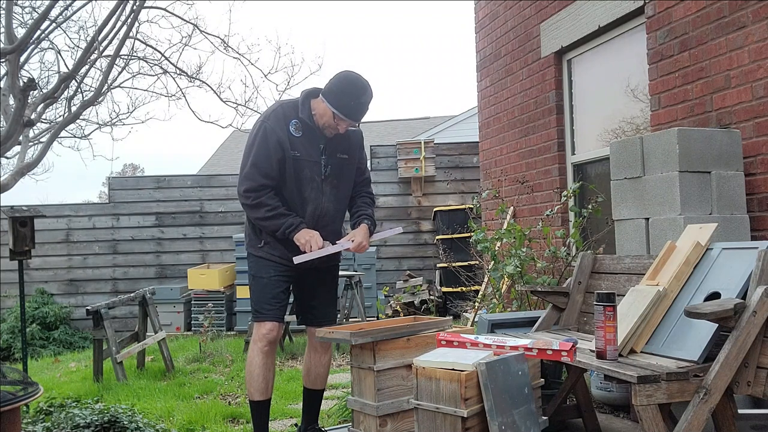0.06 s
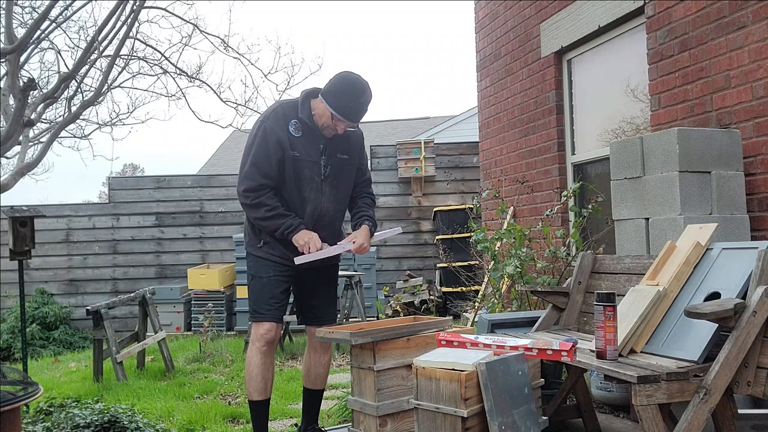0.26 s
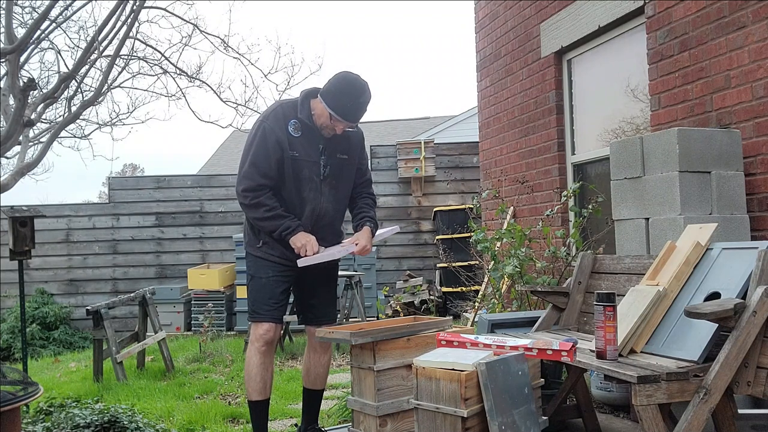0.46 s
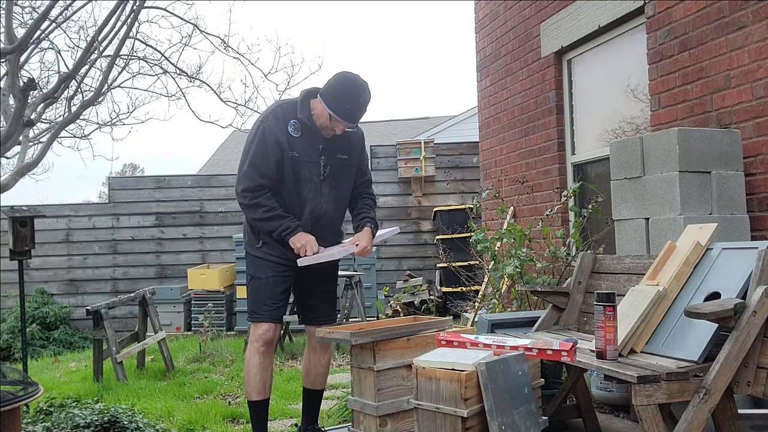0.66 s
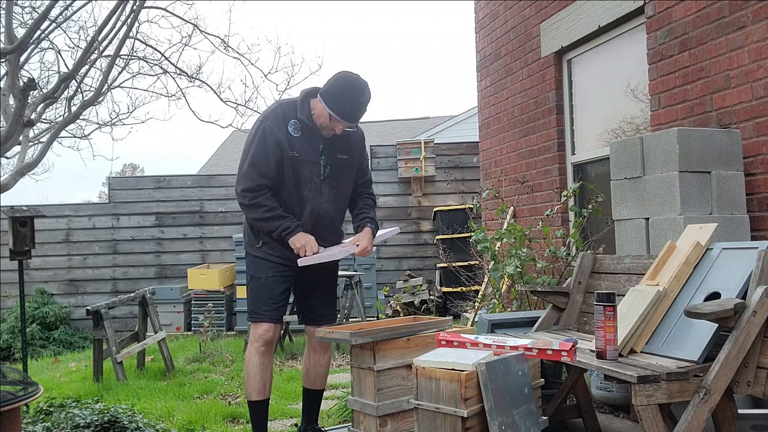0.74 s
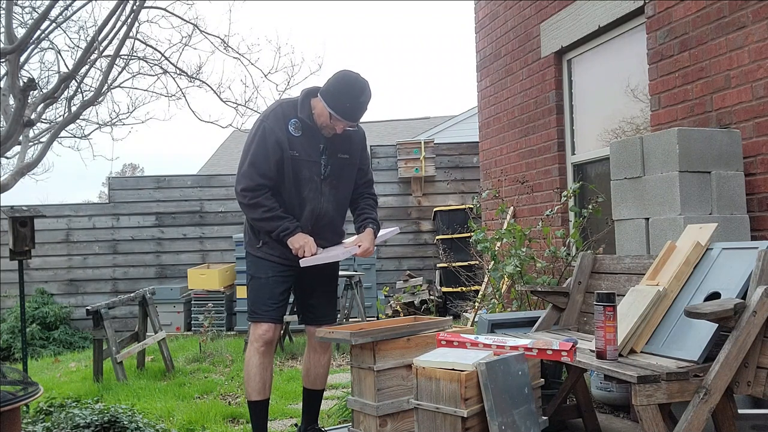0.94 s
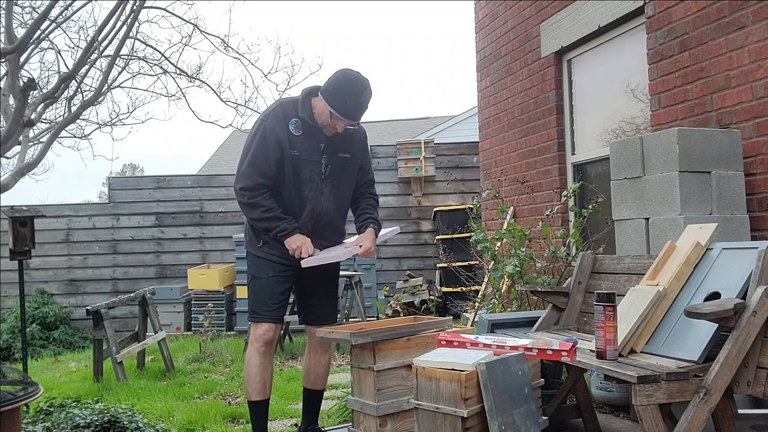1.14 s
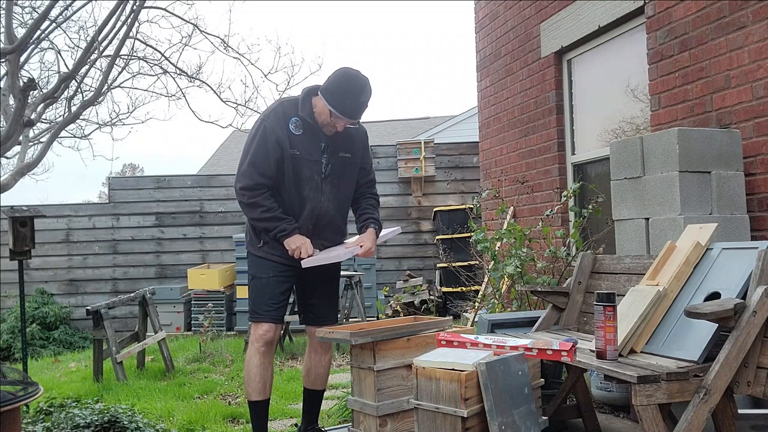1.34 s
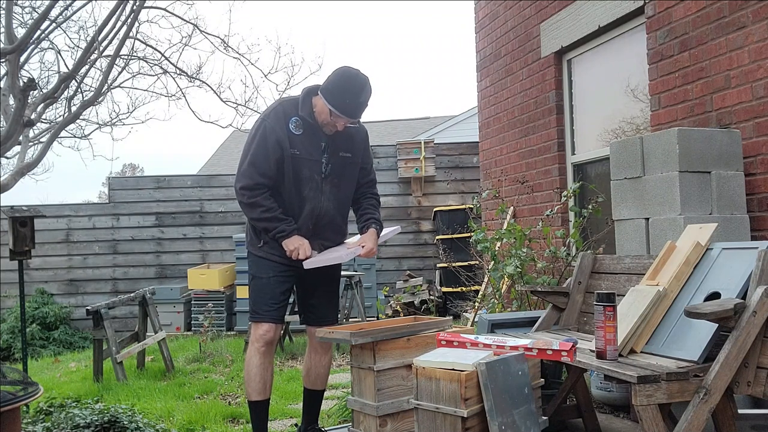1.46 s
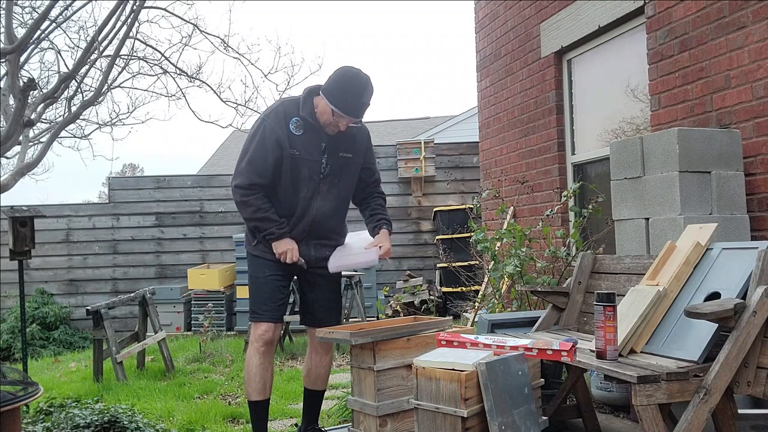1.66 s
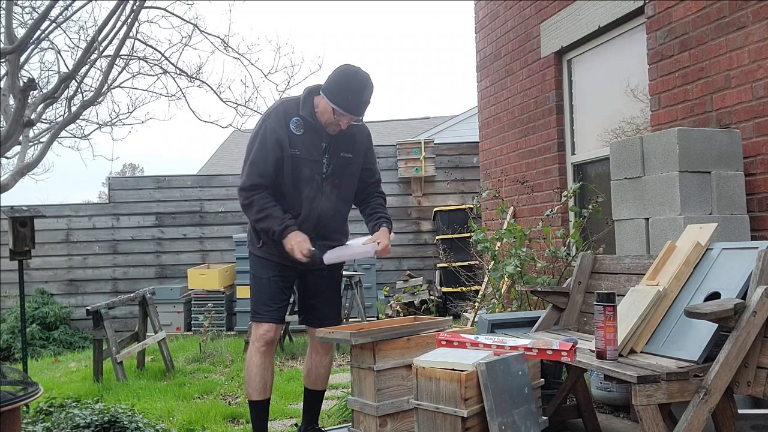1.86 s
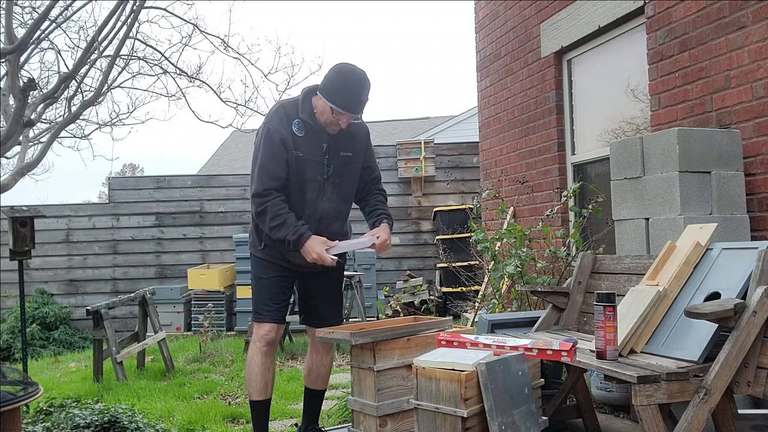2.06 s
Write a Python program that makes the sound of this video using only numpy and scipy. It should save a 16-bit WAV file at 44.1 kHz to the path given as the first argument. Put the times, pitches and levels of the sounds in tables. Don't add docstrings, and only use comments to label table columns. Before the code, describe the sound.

A blade saws a foam board in quick, dry, hissing strokes with a sharp snap between them, then a last rip and hollow knock with small bounces, close in a quiet yard.

```python
import sys
import numpy as np
from scipy import signal
from scipy.fft import rfft, irfft
from scipy.io import wavfile
from scipy.ndimage import uniform_filter1d

SR = 44100
rng = np.random.default_rng(int(sys.argv[2]) if len(sys.argv) > 2 else 0)


def output_pcm(signal):
    pcm = np.clip(np.atleast_2d(signal).T, -1, 1) * 32767
    wavfile.write(sys.argv[1], SR, np.round(pcm).astype(np.int16))


def how_loud(loudness_db):
    steps = np.asarray(loudness_db, float) / 20
    return 10 ** steps


N = 92610
T = np.arange(N) / SR


def rms_one(x):
    return x / np.sqrt(np.mean(x ** 2) + 1e-20)


def track(points, **ends):
    return np.interp(T, *np.transpose(points), **ends)


def butter(x, order, hz, kind="low"):
    return signal.sosfilt(signal.butter(order, hz, kind, fs=SR, output="sos"), x)


def drift(rate_hz):
    r = np.exp(-2 * np.pi * rate_hz / SR)
    settle = 4000
    noise = rng.standard_normal(N + settle)
    return rms_one(signal.lfilter([1], [1, -2 * r, r * r], noise)[settle:])


def resonate(x, peaks, patchy_db=0, favoured_hz=None):
    grip_focus_db = 1
    out = 0
    for k, (hz, width, db) in enumerate(peaks):
        r = np.exp(-np.pi * width / SR)
        wander = patchy_db * drift(rate_hz=7.4) if patchy_db else 0
        if favoured_hz is not None:
            wander = wander - grip_focus_db * np.log2(hz / favoured_hz) ** 2
        zeros = [(1 - r * r) / 2, 0, (r * r - 1) / 2]
        poles = [1, -2 * r * np.cos(2 * np.pi * hz / SR), r * r]
        out = out + (-1) ** k * how_loud(db + wander) * signal.lfilter(zeros, poles, x)
    return rms_one(out)


def strike(hits, modes, focus_db):
    hand_damps_s = 0.09
    out = np.zeros(N + SR)
    luck = rng.normal(0, 1, (len(hits), len(modes)))
    t = np.arange(SR // 4) / SR
    hz, db, t60 = np.transpose(modes)[:, :, None]
    for (s, level_db, centre_hz, attack), chance in zip(hits, luck):
        mode_db = level_db - 6.0 + db + chance[:, None] - focus_db * np.log2(hz / centre_hz) ** 2
        decay_db = 60 * t / t60 + 60 * (t / hand_damps_s) ** 2
        rings = how_loud(mode_db - decay_db) * np.cos(2 * np.pi * hz * (t - 2 * attack))
        start = int(s * SR)
        out[start:start + len(t)] += rings.sum(axis=0) * (1 - np.exp(-t / attack)) ** 2
    return out[:N]


def cells():
    cells_per_s, spread_db = 9000, 3
    size = how_loud(spread_db * np.minimum(rng.exponential(1, N), 5)) * rng.choice([-1, 1], N)
    return size * (rng.random(N) < cells_per_s / SR)


def controls():
    # t/s, rubbing level/dB, blade-face sheen/dB re rubbing, board bite/dB re rubbing
    stroke_0 = [(0, -27.5, -4, -1), (0.058, -70, 6, 9.5), (.13, -65, -7, 4)]
    stroke_1 = [(0.169, -43.5, -2, -19), (0.2, -28.5, 4.5, -28), (0.261, -28, 4.5, -9),
                (0.293, -22.5, 4.5, 2.5), (0.328, -25, 3, 0), (0.373, -35.5, -3, -14)]
    stroke_2 = [(0.401, -46, -5, -6), (0.426, -29.5, -5, -17.5), (0.451, -46, -8, -12.5),
                (.484, -36.5, 10, -19), (0.519, -26.5, 6.5, 1.5), (0.586, -18, 3.5, -1.5),
                (0.614, -21, 7, -2), (0.674, -68.5, -1.5, -1)]
    stroke_3 = [(0.759, -33.5, -21, 7), (0.788, -32, -1, -13.5), (.878, -32.5, -7, -27),
                (0.896, -31.5, 8.5, -26.5), (0.971, -22, 5, -4), (1.012, -25.5, 7, -4),
                (1.045, -34, -0.5, -7.5), (1.085, -39.5, -23, -15.5)]
    stroke_4 = [(1.116, -36.5, -17, -16.5), (1.14, -34, 9.5, -13), (1.19, -25, 8.5, -1),
                (1.225, -23.5, 7.5, 0.5), (1.259, -26.5, 7, -1.5), (1.296, -43.5, -13, -13)]
    stroke_5 = [(1.32, -40, -12, -7.5), (1.345, -42, -3, -3.5), (1.397, -30.5, 0.5, -6.5),
                (1.41, -41.5, -9, -11), (1.45, -41.5, 5, -13)]
    stroke_6 = [(1.465, -44, 5, -15.5), (1.482, -41, 15.5, -11), (1.53, -38.5, 15.5, -10),
                (1.57, -37.5, 16, -9.5), (1.61, -21, 6, 4), (1.645, -14, -4.5, -19), (1.661, -20.5, 3, 0.5),
                (1.67, -27.5, -5.5, 2), (1.701, -38.5, -3.5, 4.5), (1.75, -63.5, 18.5, 12.5),
                (1.809, -63.5, 9, 5), (1.828, -56.5, 24, 2.5), (1.888, -78, 4, 7), (1.98, -81.5, 3.5, 0),
                (2.1, -91, -3, -5)]
    strokes = [stroke_0, stroke_1, stroke_2, stroke_3, stroke_4, stroke_5, stroke_6]
    s, *columns = np.transpose(np.concatenate(strokes))
    order = np.argsort(s)
    return [np.interp(T, s[order], column[order]) for column in columns]


def rubbing():
    # f/Hz, width/Hz, level/dB
    rub_peaks = [(4608, 430, -2), (5490, 630, -1), (6267, 350, 0), (6935, 377, 0.5), (7700, 410, -3)]
    band = butter(resonate(cells(), rub_peaks), 4, [4300, 8000], "band")
    return resonate(band, rub_peaks, patchy_db=0.8)


def singing_edge():
    # f/Hz, width/Hz, level/dB
    edge_peaks = [(8710, 2200, -3.5), (8976, 360, 2.5)]
    # t/s, level/dB re rubbing
    edge_share = [(0, -2.5), (.62, -0.4), (.76, -8), (.8, -1), (1.03, -2), (1.08, -33), (1.14, -1.5),
                  (1.26, -3.5), (1.3, -26), (1.41, -17), (1.47, 4), (1.58, -1), (1.64, -8.5)]
    return how_loud(track(edge_share)) * resonate(resonate(cells(), edge_peaks), edge_peaks[:1])


def blade_face():
    # f/Hz, width/Hz, level/dB
    sheen_peaks = [(10930, 2200, -17), (12990, 700, -9), (14800, 1480, 12.5), (16400, 900, -7.5)]
    return resonate(butter(cells(), 3, 9500, "high"), sheen_peaks)


def slot():
    # f/Hz, width/Hz, level/dB
    slot_peaks = [(1600, 200, -7.5), (2197, 400, -7), (3323, 960, 2), (4000, 830, 2)]
    # t/s, level/dB re rubbing
    slot_open = [(0, -5.5), (.1, 4), (.2, -9.5), (.29, -8), (.37, -15), (.43, -7.5), (.6, -7), (.85, -25),
                 (.99, -11.5), (1.07, -15), (1.13, -23), (1.22, -8), (1.3, -15.5), (1.39, -16.5),
                 (1.45, -20), (1.55, -14.5), (1.7, -4.5)]
    broad = [(hz, 2 * width, 0) for hz, width, db in slot_peaks]
    return how_loud(track(slot_open)) * resonate(resonate(cells(), broad), slot_peaks, patchy_db=1.6)


def board():
    # f/Hz, width/Hz, level/dB
    board_peaks = [(248, 65, -5.5), (413, 81, -5), (512.6, 99, -1.5), (680, 150, 0.5), (1006.7, 151, -1),
                   (1280, 130, -0.5), (1520, 120, -4.5), (1925, 100, -7), (2170, 200, -6.5),
                   (2720, 250, -6.5)]
    # t/s, f/Hz
    grip = [(0, 650), (.2, 1200), (.3, 1000), (.43, 1200), (.56, 850), (.8, 900), (.99, 642), (1.1, 900),
            (1.17, 600), (1.23, 809), (1.36, 900), (1.53, 800), (1.62, 800), (1.8, 800)]
    driven = butter(resonate(cells(), board_peaks), 2, 220, "high")
    return resonate(driven, board_peaks, patchy_db=1.6, favoured_hz=track(grip))


def sawing(level_db, sheen_db, bite_db):
    judder = how_loud(level_db + 1.1 * drift(rate_hz=120) + 0.5 * drift(rate_hz=26))
    blade = how_loud(-3.5) * rubbing() + singing_edge() + how_loud(sheen_db) * blade_face()
    return judder * (blade + slot() + how_loud(bite_db) * board())


def rip():
    # t/s, level/dB
    tearing = [
        (1.57, -61.5),
        (1.6, -30.5),
        (1.624, -16.5),
        (1.648, -13.5),
        (1.679, -36.5),
        (1.76, -63.5),
    ]
    # f/Hz, width/Hz, level/dB
    tear_peaks = [(600, 300, 1), (2690, 470, 4.5), (3800, 440, 2), (4940, 980, 0), (6500, 1300, -11.5),
                  (8100, 2700, -5)]
    level_db = track(tearing, left=-120, right=-120) + 2.0 * drift(rate_hz=180)
    return how_loud(level_db) * resonate(cells(), tear_peaks)


def snaps():
    # t/s, peak level/dB, favoured f/Hz, attack/s
    cracks = [
        (.7385, 1.5, 960, 0.00079),
        (.7165, -31.5, 1700, 0.0013),
        (0.71, -37.5, 920, .001),
        (1.1, -32, 1600, 0.00126),
    ]
    # f/Hz, level/dB, t60/s
    crack_modes = [(520, -2, 0.034), (700, -6, 0.032), (880, -15.5, .03), (1075, 0.5, 0.041),
                   (1310, 3.5, 0.023), (1500, -17.5, .02), (1880, -9, 0.034), (2300, -18, .03),
                   (4740, 1, 0.0052)]
    return butter(strike(cracks, crack_modes, focus_db=3.5), 2, 300, "high")


def knocks():
    # f/Hz, level/dB, t60/s
    hollow_hits = [
        (1.658, 0.8, 280, 0.00087),
        (1.6665, 3.5, 330, 0.0008),
        (1.678, 0, 400, 0.0015),
        (1.686, -2, 450, 0.0015),
    ]
    hollow_modes = [(124, -13, 0.095), (193, -6.5, 0.13), (276.2, 1, 0.1), (402, -11.5, 0.074),
                    (446, -6.5, .08), (572.6, -7.5, .06), (717, -5.5, 0.08), (974, -15, 0.042)]
    edge_hits = [
        (1.747, -16, 400, 0.00296),
        (1.753, -14, 680, 0.00306),
    ]
    edge_modes = [(280, -2, .08), (356, -7.5, 0.14), (435, 4, .04), (687, -2.5, 0.084), (845, -12.5, 0.074),
                  (965, -23, 0.11)]
    flat_hits = [
        (1.818, -12.5, 383, .003),
        (1.826, -13, 260, .003),
    ]
    flat_modes = [(120, -4.5, .09), (195, -2.5, .05), (284, -6, 0.11), (443.5, -3.5, 0.12), (570, -16, .05),
                  (807, -14, 0.11)]
    hollow = strike(hollow_hits, hollow_modes, focus_db=6.5)
    on_edge = strike(edge_hits, edge_modes, focus_db=10.0)
    on_flat = strike(flat_hits, flat_modes, focus_db=6.0)
    return hollow + on_edge + on_flat


def squeaks():
    # start t/s, length/s, f/Hz, glide/(Hz/s), level/dB
    whistles = [(.015, 0.095, 3590, 3000, -54), (0.011, 0.092, 2157, 0, -56),
                (.115, 0.053, 1700, -600, -55.5), (0.126, 0.056, 3320, -1.5, -51),
                (0.171, 0.2, 1600, -1200, -49), (0.194, .065, 1280, 15, -40), (0.377, 0.03, 3370, 0, -40.5),
                (.405, .04, 1280, 0, -40), (0.401, 0.053, 1610, 0, -44.5), (.78, 0.042, 1040, 2500, -45.5),
                (.78, 0.12, 2200, 0, -62), (.78, .12, 3490, 2, -54), (1.036, 0.012, 3440, -1, -40),
                (1.082, 0.032, 1289, 0, -49), (1.115, .06, 3700, 1000, -62), (1.27, 0.072, 2330, 0, -57),
                (1.325, 0.099, 807, 6003, -39.5), (1.33, 0.041, 2970, 2, -58), (1.396, 0.021, 3730, 0, -45),
                (1.378, 0.31, 1330, 86, -48), (1.48, .11, 860, 0, -50), (1.53, 0.036, 3870, -5, -50.5)]
    width_hz = 105
    out = 0
    for start, length, hz, glide, db in whistles:
        age = T - start
        phase = 2 * np.pi * (hz + glide * age / 2) * age
        tone = drift(width_hz) * np.sin(phase) + drift(width_hz) * np.cos(phase)
        swell = np.sin(np.pi * np.clip(age / length, 0, 1)) ** 0.53
        out = out + how_loud(db) * tone * swell
    return out


def ticks():
    # t/s, peak level/dB, face brightness/dB
    touches = [(0.0907, -45, 0), (0.12, -25.5, 5), (0.407, -19, 2), (0.695, -27.5, 3), (0.708, -16, -1),
               (0.7393, 1, -5), (1.0897, -27, 7), (1.3049, -39.5, 24), (1.3274, -25, 12), (1.345, -40, 16),
               (1.8237, -25, 3.5), (1.9574, -51, 1), (2.06, -58, 2.5)]
    t60_s, attack_s = 0.021, 0.0011
    body_drive = resonate(cells(), [(4940, 1800, 0), (8700, 1200, 0)])
    body = resonate(body_drive, [(4940, 700, 0.5), (6800, 900, -7.5), (8680, 800, 3.0)])
    face_drive = resonate(cells(), [(14500, 2800, 0)])
    face = resonate(face_drive, [(12900, 500, -5.5), (14800, 970, -1)])
    out = 0
    for s, db, bright_db in touches:
        age = np.maximum(T - s, 0)
        puff = how_loud(db - 11.5 - 60 * age / t60_s) * (1 - np.exp(-age / attack_s))
        out = out + (body + how_loud(bright_db - 2.0) * face) * puff
    return out


def echoes(work):
    # delay t/s, level/dB
    paths = [
        (.007, -20),
        (.023, -22),
        (.04, -33),
    ]
    dull = butter(work, 1, 3200)
    return sum(how_loud(db) * np.concatenate([np.zeros(int(s * SR)), dull])[:N] for s, db in paths)


def air(level_db):
    # f/Hz, density level/dB per Hz
    hush_spectrum = [(150, -4.5), (400, 4), (1000, -10), (4000, -15), (15000, -24)]
    gate_s, follows = 0.03, 0.27
    hz, db = np.transpose(hush_spectrum)
    bins_hz = np.arange(N // 2 + 1) * SR / N
    tone = how_loud(np.interp(np.log(bins_hz + 1), np.log(hz), db))
    hush = rms_one(irfft(rfft(rng.standard_normal(N)) * tone, N))
    gate_db = follows * (uniform_filter1d(level_db, int(gate_s * SR) + 1) + 36.0)
    return hush * how_loud(-61.5 + gate_db + 2.0 * drift(rate_hz=8.7))


def wind():
    breeze_hz = 62
    low = resonate(rng.standard_normal(N), [(breeze_hz, 70, 0)])
    low = resonate(low, [(breeze_hz, 120, 0)])
    return low * how_loud(-72 + 3.6 * drift(rate_hz=12) - 60 * np.maximum(T - 1.85, 0))


def scene():
    level_db, sheen_db, bite_db = controls()
    work = sawing(level_db, sheen_db, bite_db) + rip() + snaps() + knocks() + squeaks() + ticks()
    mono = work + echoes(work) + air(level_db) + wind()
    return np.array([mono, mono])


def band_limit(x):
    return signal.sosfilt(signal.butter(12, 16820, fs=SR, output="sos"), x)


def record(dry):
    limit = 0.97
    thin = butter(dry, 2, 75.6, "high")
    rounded = limit * np.tanh((np.abs(thin) / limit) ** 3) ** (1 / 3) * np.sign(thin)
    top_cut = signal.ellip(14, 0.5, 85, 15700, fs=SR, output="sos")
    return band_limit(signal.sosfilt(top_cut, rounded))


dry = scene()
out = record(dry)
output_pcm(out)
```